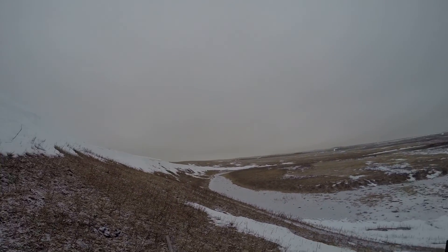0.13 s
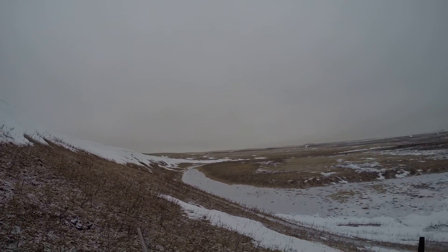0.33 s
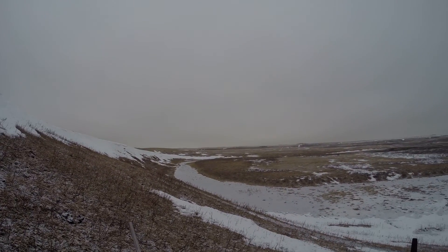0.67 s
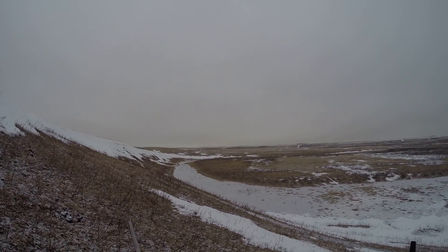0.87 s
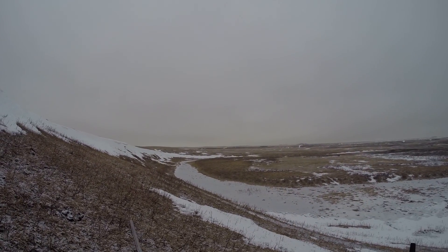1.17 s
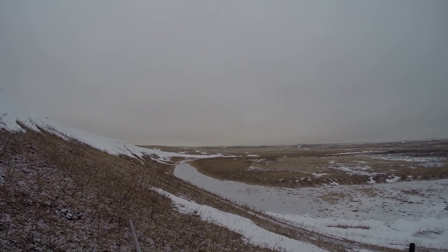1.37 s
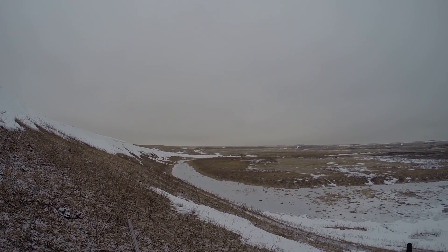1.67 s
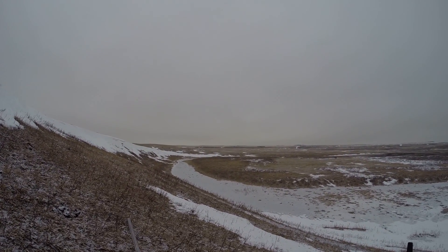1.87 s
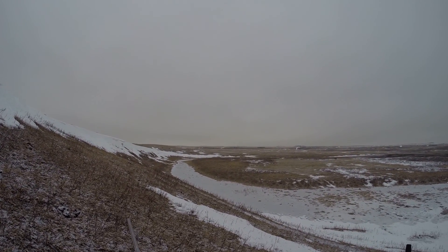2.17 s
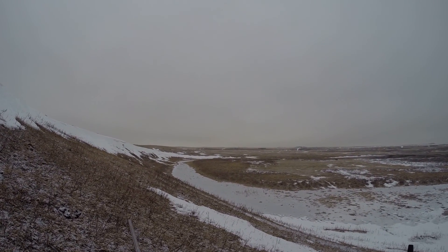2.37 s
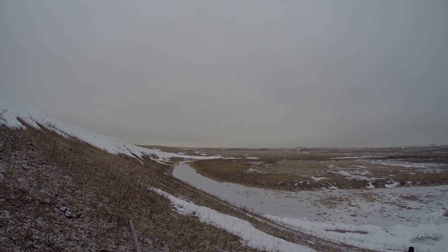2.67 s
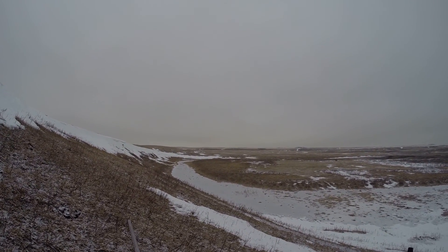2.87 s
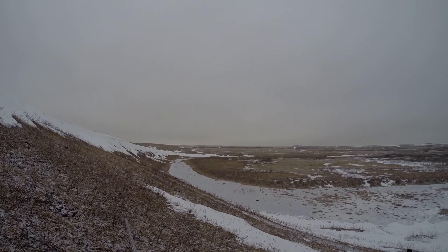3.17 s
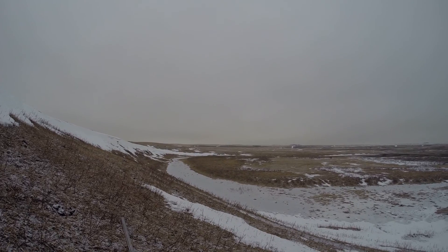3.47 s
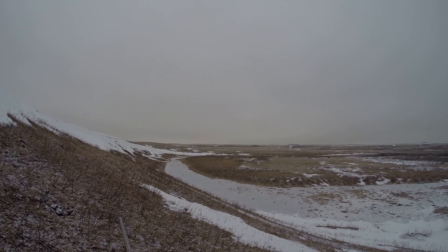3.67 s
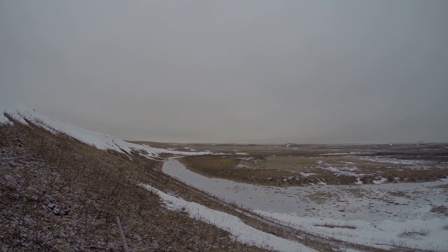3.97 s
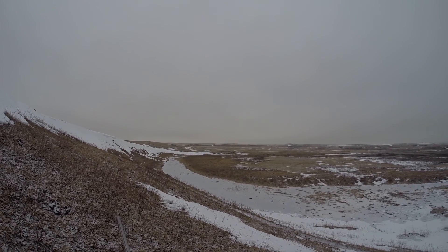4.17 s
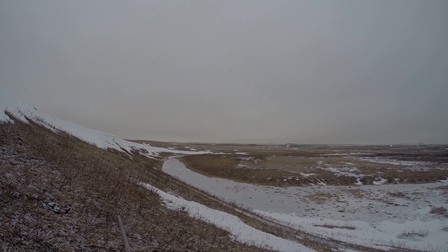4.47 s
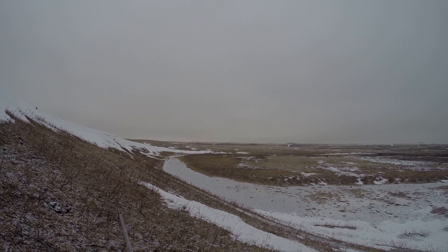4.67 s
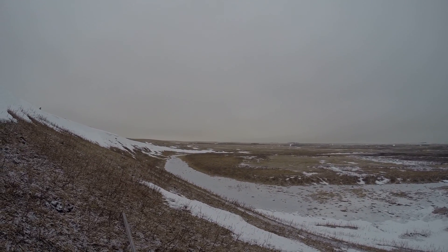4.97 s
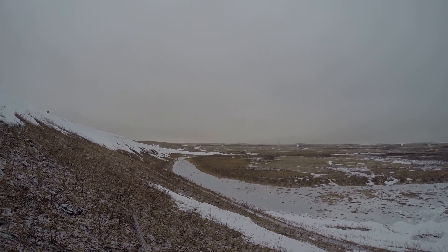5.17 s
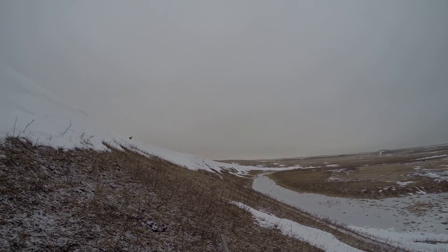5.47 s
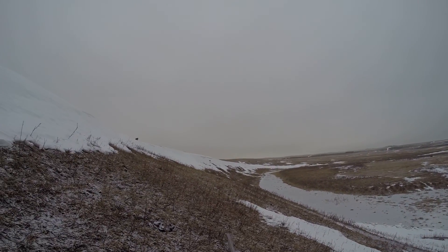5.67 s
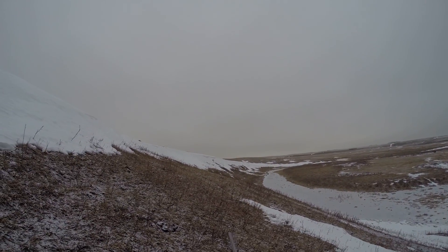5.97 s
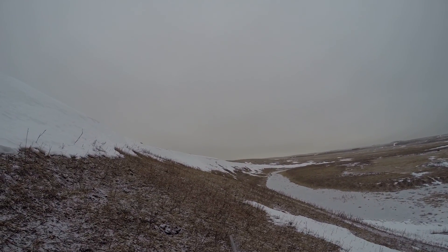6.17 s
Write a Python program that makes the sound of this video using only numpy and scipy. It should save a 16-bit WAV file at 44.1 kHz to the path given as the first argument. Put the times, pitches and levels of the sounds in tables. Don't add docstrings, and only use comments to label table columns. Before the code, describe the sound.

A wild canine yips, yelps and gives short wavering howls over an open snowy slope, with a distant pack murmuring and faint echoes.

```python
import sys
import numpy as np
from scipy import signal
from scipy.io import wavfile
from scipy.ndimage import uniform_filter1d

SR = 44100
rng = np.random.default_rng(int(sys.argv[2]) if len(sys.argv) > 2 else 0)


def decibels_to_gain(level_db):
    exponent = np.asarray(level_db, float) / 20
    return 10 ** exponent


def unload_wav(signal):
    wavfile.write(
        sys.argv[1],
        SR,
        np.round(np.clip(np.atleast_2d(signal).T, -1, 1) * 32767).astype(np.int16),
    )


N = 278712
T = np.arange(N) / SR

# t/s, pitch f/Hz, effort level/dB
YIPS = [
    [(.143, 928, -48.5), (.148, 1063, -41), (.158, 1228, -46), (.167, 1237, -45.5), (.177, 1208, -49.5),
     (.185, 1065, -58)],
    [(.192, 990, -41.5), (.199, 890, -54), (.205, 845, -51), (.212, 815, -68)],
    [(.288, 1177, -65), (.301, 1188, -54), (.313, 958, -44), (.323, 936, -48), (.329, 1147, -41),
     (.34, 1167, -41.5), (.351, 1164, -40.5), (.367, 1040, -40.5), (.378, 952, -53)],
    [(4.243, 963, -55), (4.261, 1013, -44.5), (4.287, 959, -45), (4.319, 956, -51), (4.335, 1008, -61)],
    [(4.4, 1169, -61), (4.418, 1007, -48.5), (4.432, 984, -51), (4.44, 1048, -45), (4.46, 1050, -40.5),
     (4.472, 1205, -45), (4.494, 1184, -49.5)],
    [(4.656, 890, -61), (4.667, 905, -52), (4.683, 998, -47), (4.695, 997, -42.5), (4.727, 907, -54.5)],
    [(4.822, 1125, -59), (4.836, 932, -60), (4.848, 931, -54.5), (4.866, 965, -53), (4.876, 1040, -48.5),
     (4.9, 992, -52.5), (4.915, 1025, -53.5), (4.934, 1005, -55.5)],
]
WARBLES = [
    [(.584, 918, -58), (.6, 924, -52), (.612, 928, -49), (.638, 1014, -39.5), (.652, 1022, -40.5),
     (.662, 945, -43.5), (.674, 942, -41), (.684, 1084, -40), (.691, 1127, -41.5)],
    [(.703, 1051, -40), (.72, 1068, -40), (.731, 1004, -39.5), (.746, 973, -42), (.778, 978, -44.5),
     (.79, 1110, -50), (.798, 1099, -46.5)],
    [(1.991, 939, -57), (2.0, 928, -50), (2.012, 967, -38), (2.022, 970, -41.5), (2.037, 924, -46.5),
     (2.058, 900, -45), (2.086, 946, -43), (2.108, 989, -37.5)],
    [(2.138, 942, -41.5), (2.149, 995, -37.5), (2.163, 1146, -37.5), (2.178, 1069, -38),
     (2.19, 1123, -40.5), (2.201, 1105, -36.5), (2.214, 932, -42)],
    [(2.986, 1099, -38.5), (2.997, 1036, -40), (3.005, 922, -44), (3.02, 923, -44.5), (3.049, 957, -39.5),
     (3.098, 954, -43)],
    [(3.105, 972, -42), (3.12, 1041, -40), (3.136, 1022, -40), (3.16, 938, -44), (3.185, 947, -45),
     (3.213, 998, -36.5), (3.23, 1042, -40.5), (3.252, 1070, -46), (3.26, 1060, -59)],
    [(3.773, 1308, -44.5), (3.864, 1360, -46.5), (3.872, 1446, -46.5), (3.887, 1292, -51),
     (3.899, 1282, -51), (3.911, 1484, -45), (3.957, 1640, -49.5), (3.997, 1605, -51), (4.027, 1454, -47.5)],
]
YELPS = [
    [(1.04, 833, -74), (1.053, 920, -57), (1.069, 935, -42.5), (1.081, 1093, -37), (1.097, 1158, -41),
     (1.107, 1140, -45)],
    [(1.463, 798, -68), (1.479, 881, -48), (1.493, 1130, -36.5), (1.501, 1166, -45), (1.508, 1330, -43),
     (1.515, 1298, -49.5)],
    [(1.541, 1040, -44), (1.563, 983, -40.5), (1.581, 960, -40), (1.591, 1052, -38), (1.599, 1070, -39)],
    [(1.613, 1244, -36.5), (1.631, 1297, -39.5), (1.638, 1237, -42.5), (1.651, 1240, -37),
     (1.681, 1293, -37), (1.702, 1452, -38.5)],
    [(1.72, 1533, -37), (1.744, 1527, -38), (1.758, 1490, -34), (1.79, 1489, -35.5), (1.802, 1230, -40.5),
     (1.814, 1039, -48.5)],
    [(2.773, 884, -66), (2.776, 887, -43), (2.784, 919, -58.5), (2.798, 956, -38)],
    [(2.803, 1168, -41), (2.813, 1211, -41.5), (2.84, 1197, -39.5), (2.882, 1072, -38.5),
     (2.888, 1048, -36.5), (2.894, 1104, -39), (2.928, 1179, -42.5), (2.975, 1149, -43.5)],
    [(5.812, 1036, -56), (5.818, 1040, -43.5), (5.827, 1254, -37.5), (5.831, 1404, -37), (5.837, 1467, -34),
     (5.871, 1483, -33.5), (5.889, 1410, -34.5), (5.897, 1181, -41.5)],
    [(5.912, 1151, -40), (5.93, 1148, -42.5), (5.946, 1149, -41.5), (5.969, 1132, -35.5),
     (5.977, 1075, -37.5)],
]
HOWLS = [
    [(1.123, 936, -40.5), (1.135, 947, -45), (1.151, 978, -46.5), (1.19, 967, -41.5), (1.223, 961, -38.5),
     (1.28, 946, -44)],
    [(2.232, 911, -46), (2.31, 920, -42.5), (2.345, 955, -39.5), (2.368, 1033, -36.5), (2.4, 999, -37),
     (2.47, 996.5, -34), (2.55, 972, -38.5), (2.578, 997.6, -37.5), (2.603, 983, -38), (2.613, 975, -60)],
    [(3.506, 955, -44.5), (3.55, 988, -38), (3.6, 1124, -41), (3.663, 1160, -39), (3.671, 1116, -40),
     (3.682, 1157, -42), (3.721, 1154, -43.5), (3.737, 1197, -44)],
    [(5.126, 980, -61), (5.138, 992, -57), (5.162, 1150, -61), (5.2, 1124, -59.5), (5.28, 1134, -43),
     (5.31, 1143, -41), (5.352, 1157, -39), (5.39, 1078, -40), (5.409, 1166, -39.5)],
    [(5.429, 1040, -37.5), (5.455, 983, -40), (5.5, 971, -40.5), (5.545, 952, -44.5), (5.563, 966, -43.5),
     (5.577, 1005, -37), (5.586, 992, -58)],
    [(5.989, 993, -41), (6.003, 961, -40), (6.06, 922.5, -46.5), (6.138, 914, -52.5), (6.208, 934, -48.5),
     (6.256, 906, -60.5), (6.3, 890, -63)],
]
# start t/s, end t/s, flutter rate f/Hz, swing f/Hz
FLUTTERS = [
    (.327, 0.352, 108, 88),
    (2.166, 2.192, 117, 80),
    (2.905, 2.98, 96.2, 35),
    (3.771, 3.869, 61.8, 26),
    (5.355, 5.398, 58, -56),
]
# start t/s, peak t/s, end t/s, peak level/dB
DOUBLED = [(.595, .64, .676, -47), (.672, .69, .71, -49), (.7, .735, .776, -50),
           (1.095, 1.118, 1.13, -49.5), (2.022, 2.042, 2.08, -45), (2.07, 2.088, 2.106, -56),
           (2.1, 2.14, 2.171, -40), (2.16, 2.184, 2.2, -50), (2.19, 2.208, 2.262, -46.5),
           (2.394, 2.43, 2.5, -46), (2.42, 2.54, 2.59, -38), (2.885, 2.895, 2.975, -57),
           (2.965, 3.015, 3.07, -42.5), (3.04, 3.11, 3.19, -38.5), (3.14, 3.195, 3.228, -46),
           (4.26, 4.268, 4.284, -53), (4.686, 4.698, 4.73, -49), (5.35, 5.375, 5.425, -51),
           (5.416, 5.44, 5.507, -43.5), (5.97, 5.997, 6.061, -36.5), (6.08, 6.16, 6.23, -59)]
# start t/s, end t/s, level/dB
OCTAVE = [(.59, .64, -66), (1.036, 1.075, -63), (1.08, 1.11, -65.5), (1.11, 1.25, -68),
          (1.463, 1.478, -53.5), (1.56, 1.62, -71), (1.99, 2.05, -65), (2.22, 2.34, -67),
          (2.47, 2.61, -70.5), (4.255, 4.29, -64), (2.773, 2.798, -52.5), (2.843, 2.88, -63.5),
          (2.9, 2.99, -65), (3.01, 3.11, -66.5), (3.5, 3.54, -65.5), (3.59, 3.67, -64), (3.695, 3.75, -61),
          (3.77, 3.87, -67.5), (.355, .39, -66), (4.655, 4.745, -65.5), (5.27, 5.45, -74),
          (6.0, 6.08, -62.5), (6.1, 6.21, -67.5), (2.805, 2.812, -66.5)]
TWELFTH = [(2.04, 2.08, -70), (2.22, 2.33, -66), (3.55, 3.65, -72), (5.28, 5.36, -76)]
# start t/s, end t/s, level/dB
FIVE_HALVES = [(2.02, 2.05, -65), (2.16, 2.31, -72), (2.38, 2.45, -75)]
SEVEN_HALVES = [(2.41, 2.59, -73.5)]
EIGHT_HALVES = [(2.24, 2.34, -80)]
NINE_HALVES = [(2.42, 2.56, -79)]
# start t/s, end t/s, level/dB
QUARTERS = [(2.885, 2.915, -54), (2.915, 2.97, -58), (3.668, 3.738, -52)]
THIRDS = [(3.803, 3.88, -54)]
# start t/s, end t/s, rasp level/dB against the tone
RASPS = [(.775, .81, -2.5), (1.085, 1.12, -13.5), (.33, .35, -20), (2.165, 2.19, -9), (2.796, 2.803, -8),
         (2.91, 2.98, -5.5), (3.78, 3.93, -32), (4.44, 4.5, -20), (5.345, 5.42, -17), (6.07, 6.25, -22)]
# t/s, peak level/dB
POPS = [(1.99, -48), (0.13, -54), (2.776, -43), (5.808, -46), (3.497, -43), (1.064, -45), (4.402, -60),
        (4.66, -61)]
# delay t/s, level/dB
ECHO = [(0.012, -36), (.04, -40.5), (.1, -47.5), (0.143, -36), (.158, -40.5), (.165, -50.5), (.3, -52)]
# delay t/s, level/dB
RIDGE = (0.152, -23.5)
# start t/s, full from t/s, full to t/s, end t/s, level/dB
MURMUR = [(0.074, 0.13, 0.62, .57, -63), (0.444, 0.682, .7, 0.99, -59), (1.131, 1.2, 1.73, 2.08, -61.5),
          (1.992, 2.149, 2.36, 2.87, -65), (2.764, 2.902, 3.16, 3.3, -61), (3.44, 3.81, 4.03, 4.5, -60.5),
          (4.151, 4.267, 4.3, 4.6, -59), (4.378, 4.428, 4.43, 5, -62), (4.6, 4.679, 4.38, 5.14, -61.5),
          (5.073, 5.341, 5.4, 5.66, -62), (6.06, 6.152, 6.27, 6.52, -60.5), (3.252, 3.331, 3.47, 3.66, -67),
          (5.501, 5.599, 5.65, 5.8, -68), (3.701, 3.79, 4.04, 4.1, -59)]
# f/Hz, level/dB (per Hz)
MURMUR_TONE = [(250, 0), (600, -0.5), (760, 2.5), (1640, 10.5), (1720, 8.5), (2800, 0), (3400, -7),
               (8000, -26)]
# f/Hz, width f/Hz, level/dB
MURMUR_PEAKS = [(450, 100, 10), (830, 90, 5), (1550, 60, 6), (2310, 50, 6), (2750, 120, 3)]
# start t/s, end t/s, start f/Hz, end f/Hz,
# level/dB
FAR = [(.102, .138, 1600, 1530, -61), (5.315, 5.35, 1480, 1500, -58), (3.97, 4.0, 2640, 2640, -66),
       (.135, .143, 1560, 1680, -57), (.815, .9, 1600, 1600, -65), (.39, .58, 1570, 1580, -68),
       (1.363, 1.6, 1510, 1500, -65), (3.75, 3.86, 2304, 2300, -66), (3.88, 4.06, 2310, 2300, -66),
       (4.049, 4.298, 1580, 1570, -65), (4.758, 4.784, 1250, 1260, -57), (4.755, 4.785, 1540, 1570, -63),
       (1.826, 1.84, 1240, 1260, -58), (1.812, 1.848, 1545, 1535, -57), (1.915, 1.948, 1515, 1495, -52),
       (2.989, 3.25, 2285, 2346, -70), (2.33, 2.52, 2740, 2735, -72), (5.274, 5.52, 2297, 2270, -69),
       (6.129, 6.22, 2773, 2794, -71), (3.17, 3.22, 3420, 3520, -74)]
# start t/s, end t/s, middle f/Hz, width f/Hz, level/dB
HAZE = [(1.22, 1.98, 2700, 490, -72.5), (2.94, 3.37, 2310, 290, -66.5), (3.9, 4.1, 2600, 360, -65.5),
        (4.34, 4.65, 2750, 250, -69.5), (4.7, 4.81, 2800, 300, -68), (5.26, 5.5, 2100, 680, -70),
        (5.3, 5.65, 3000, 860, -74), (1.7, 1.95, 2400, 230, -73), (0.16, 0.99, 2400, 460, -80)]
# middle t/s, level/dB
CHIRPS = [(0.679, -77), (.81, -78.5), (0.939, -79), (1.201, -76), (1.319, -80.5), (1.551, -77),
          (1.79, -77.5), (1.96, -82), (2.2, -79), (2.31, -77.5), (2.609, -80), (3.14, -78.5), (3.291, -79),
          (3.37, -82.5), (3.66, -77), (3.8, -79), (4.04, -77), (4.29, -79), (4.45, -78), (4.72, -79),
          (4.83, -80.5), (5.119, -81.5)]
# start t/s, end t/s, f/Hz, level/dB, octave level/dB
SQUEAKS = [
    (2.95, 3.02, 6645, -83, -76),
    (3.04, 3.09, 8000, -80, -95),
    (5.82, 5.89, 6655, -80, -76),
]
# middle t/s, length t/s, level/dB
GUSTS = [(0.295, 0.038, -65), (.5, .02, -56), (0.952, 0.036, -60), (1.2, .05, -64), (1.86, .04, -55),
         (2.13, 0.028, -54), (2.418, .04, -60), (2.779, 0.027, -61), (4.36, 0.057, -58.5),
         (4.899, 0.098, -62), (5.2, .04, -58), (6.2, 0.047, -62)]
# f/Hz, level/dB (per Hz)
AIR = [(10, -4), (28, 5), (60, -6.5), (85, -9.5), (250, -11.5), (600, -18.5), (1500, -24), (3000, -26.5),
       (6000, -32), (10000, -38), (14000, -40.5), (15300, -48)]
# f/Hz, share
KEPT = [(12600, 1), (12900, .72), (14000, .7), (14250, .45), (14900, .33), (15100, .07), (15300, .02)]

LEGATO_S = .05
ATTACK_S, ATTACK_DB, SCOOP = 0.01316, -35, .04
RELEASE_S, RELEASE_DB, SAG = .016, -37, .06
THROAT_HZ, THROAT_WIDTH_HZ, THROAT_DB = 1211, 179, 7
LOCK_ENDS_DB, LOCK_BEND, LOCK_SHUT_DB = -16, 3.0, -200
MURMUR_REST_DB, MURMUR_LOW_DB = -74.5, 5
AIR_DB = -58.5


def voice():
    shimmer, shake = rng.standard_normal((N, 2)).T
    turns = 2 * np.pi * np.cumsum(pitch()) / SR

    def line(count, order=1):
        return np.sqrt(2) * np.cos(turns * count / order)

    s, meant_hz, db = sung()
    off_throat = (np.interp(T, s, meant_hz) - THROAT_HZ) / THROAT_WIDTH_HZ
    throat_db = THROAT_DB / (1 + (2 * off_throat) ** 2)
    effort = decibels_to_gain(uniform_filter1d(np.interp(T, s, db) + throat_db, size=90))
    effort *= decibels_to_gain(0.25 * np.tanh(evened(band(shimmer, 12.0, 100))))
    tone = effort * line(count=1)

    doubled = line(count=3, order=2) + decibels_to_gain(-33.5) * line(count=1, order=2)
    doubled *= swells(DOUBLED, LOCK_ENDS_DB, LOCK_BEND, LOCK_SHUT_DB)

    quarters = line(count=3, order=4) + decibels_to_gain(0.5) * line(count=5, order=4)
    quarters += decibels_to_gain(-4) * line(count=6, order=4) + decibels_to_gain(-15) * line(count=9, order=4)
    quarters *= spans(QUARTERS, edge=0.013)

    throb = 1 + .8 * np.sin(2 * np.pi * 55 * T)
    thirds = throb * (line(count=2, order=3) + decibels_to_gain(-25) * line(count=1, order=3))
    thirds *= spans(THIRDS)

    rasp = spans(RASPS) * evened(band(shake, 130, 480) + 2.2 * band(shake, 75, 125))
    shaken = band(band(rasp * (tone + doubled), 800, 1800), 760, 1900)

    upper = spans(OCTAVE, edge=0.013) * line(count=2)
    upper += spans(TWELFTH) * line(count=3)
    upper += spans(FIVE_HALVES) * line(count=5, order=2)
    upper += spans(SEVEN_HALVES) * line(count=7, order=2)
    upper += spans(EIGHT_HALVES) * line(count=4)
    upper += spans(NINE_HALVES) * line(count=9, order=2)
    upper *= decibels_to_gain(1.5 * evened(band(shimmer, 15, 90))) + 2 * rasp
    return tone + doubled + upper + quarters + thirds + shaken


def pitch():
    s, hz, _ = sung()
    waver = 1 + 0.0039 * evened(band(rng.standard_normal(N), 9.0, 75))
    flutter = np.zeros(N)
    for a, b, rate, swing in FLUTTERS:
        flutter += swing * spans([(a, b, 0)], edge=0.005) * np.sin(2 * np.pi * rate * (T - a))
    return uniform_filter1d(np.interp(T, s, hz), size=150) * waver + flutter


def sung():
    notes = sorted(YIPS + WARBLES + YELPS + HOWLS)
    rows = [row for note in notes for row in note]
    ends = [s for note in notes for s in (note[0][0], note[-1][0])]
    gaps = np.diff([-9] + ends + [99])[::2]
    for note, before, after in zip(notes, gaps, gaps[1:]):
        (a, a_hz, a_db), (b, b_hz, b_db) = note[0], note[-1]
        if before > LEGATO_S:
            rows += [(a - ATTACK_S * k, a_hz * (1 - SCOOP), a_db + ATTACK_DB * k ** 2) for k in (1, 2)]
        if after > LEGATO_S:
            rows += [(b + RELEASE_S * k, b_hz * (1 - SAG), b_db + RELEASE_DB * k ** 2) for k in (1, 2)]
    return np.transpose(sorted(rows))


def swells(rows, ends_db, bend, shut_db=0):
    power = np.zeros(N)
    for a, peak, b, db in rows:
        rising = (peak - T) / max(peak - a, 1e-3)
        falling = (T - peak) / max(b - peak, 1e-3)
        away = np.where(T < peak, rising, falling)
        level_db = db + ends_db * np.minimum(away, 9) ** bend + shut_db * np.maximum(away - 1, 0)
        power += decibels_to_gain(2 * level_db)
    return np.sqrt(power)


def pops():
    snaps, t = np.zeros(N), T[:400]
    for s, db in POPS:
        snaps[round(s * SR)] = decibels_to_gain(db)
    ring = np.sin(2 * np.pi * 1150 * t) * decibels_to_gain(-60 * t / 0.017)
    return signal.oaconvolve(snaps, ring)[:N]


def slopes(x):
    taps, drift = rng.standard_normal(SR // 3), rng.standard_normal(N)
    delay, db = np.transpose(ECHO)
    tail = taps * decibels_to_gain(np.interp(T[:len(taps)], delay, db, left=-99, right=-99) - 21.0)
    back = signal.oaconvolve(x, tail)[:N]
    back *= decibels_to_gain(3 * np.tanh(.8 * evened(band(drift, 12, 80))))
    ridge = decibels_to_gain(RIDGE[1]) * np.interp(T - RIDGE[0], T, x)
    return decibels_to_gain(2.0) * band(back, 790, 1460) + band(decibels_to_gain(4.5) * back + ridge, 1453, 1620)


def pack():
    murmur = noise(MURMUR_TONE, patchy_db=1.4, peaks=MURMUR_PEAKS)
    low = band(murmur, 320, 1590) * (decibels_to_gain(MURMUR_LOW_DB) - 1)
    answers_db = []
    for *times, db in MURMUR:
        answers_db.append(np.interp(T, times, [MURMUR_REST_DB, db, db, MURMUR_REST_DB]))
    level_db = np.max(answers_db, axis=0)
    return (murmur + low) * decibels_to_gain(level_db) / np.std(band(murmur, 1620, 3600))


def far_tones():
    out = np.zeros(N)
    flicker = evened(band(rng.standard_normal(N), 10, 70))
    blur_hz = 9 * flicker[::-1]
    for a, b, start_hz, end_hz, db in FAR:
        hz = np.interp(T, [a, b], [start_hz, end_hz]) + blur_hz
        out += spans([(a, b, db)], edge=0.016) * np.sin(2 * np.pi * np.cumsum(hz) / SR)
    return out * decibels_to_gain(2.2 * flicker)


def haze():
    hiss = rng.standard_normal(N)
    out = np.zeros(N)
    for a, b, hz, width, db in HAZE:
        out += spans([(a, b, db)], edge=.08) * evened(band(hiss, hz - width / 2, hz + width / 2))
    return out


def chirps():
    puffs = sum(decibels_to_gain(db) * np.exp(-.5 * ((T - s) / .026) ** 2) for s, db in CHIRPS)
    narrow, wide = rng.standard_normal((N, 2)).T
    out = puffs * (evened(band(narrow, 7200, 8000)) + decibels_to_gain(-1.5) * evened(band(wide, 9000, 15000)))
    for a, b, hz, db, octave_db in SQUEAKS:
        turns = 2 * np.pi * (hz * T + 400 * (T - a) ** 2)
        turns += .3 * np.sin(2 * np.pi * 45 * T)
        out += spans([(a, b, db)]) * np.sin(turns)
        out += spans([(a, b, octave_db)]) * np.sin(2 * turns)
    return out


def gusts():
    puffs = sum(decibels_to_gain(db) * np.exp(-.5 * ((T - s) / length) ** 2) for s, length, db in GUSTS)
    return puffs * evened(band(rng.standard_normal(N), 22, 62))


def still_air():
    return decibels_to_gain(AIR_DB) * evened(noise(AIR, patchy_db=0.93))


def noise(tone, patchy_db, peaks=()):
    bins_hz = np.fft.rfftfreq(1024, 1 / SR)
    a, b, patches = rng.standard_normal((N // 256 + 5, 513, 3)).T
    patches = uniform_filter1d(patches, size=10, axis=0)
    patches = evened(uniform_filter1d(patches, size=14, axis=1))
    f, db = np.transpose(tone)
    colour_db = np.interp(np.log(bins_hz + 1), np.log(f), db, right=-90)
    for hz, width, peak_db in peaks:
        colour_db += peak_db / (1 + (2 * (bins_hz - hz) / width) ** 2)
    spectra = (a + 1j * b) * decibels_to_gain(colour_db[:, None] + patchy_db * patches)
    return signal.istft(spectra, nperseg=1024, noverlap=768)[1][:N]


def evened(x):
    return x / np.sqrt(np.mean(x ** 2) + 1e-20)


def band(x, lo_hz, hi_hz):
    return signal.sosfilt(signal.butter(3, [lo_hz, hi_hz], "bandpass", fs=SR, output="sos"), x)


def spans(rows, edge=0.027):
    gain = np.zeros(N)
    for a, b, db in rows:
        corners = [a - edge / 2, a + edge / 2, b - edge / 2, b + edge / 2]
        gain += decibels_to_gain(db) * np.interp(T, corners, [0, 1, 1, 0])
    return gain


def scene():
    caller = voice() + pops()
    distant = slopes(caller) + pack() + far_tones() + haze()
    return (caller + distant + chirps() + gusts() + still_air())[None]


def starved(x):
    hz, _, z = signal.stft(x, SR, nperseg=2048, noverlap=1024)
    share = np.interp(hz, *np.transpose(KEPT))[:, None]
    luck = np.repeat(rng.random((z.shape[2], 205)).T, 5, axis=0)
    usual = np.median(abs(z), axis=2, keepdims=True)
    strong = uniform_filter1d(abs(z), size=9, axis=1) > 2.5 * usual
    z = z * ((luck < share) | strong) / np.maximum(share, .3) ** .5
    return signal.istft(z, SR, nperseg=2048, noverlap=1024)[1][:, :N]


def band_limit(x):
    return signal.sosfilt(signal.butter(12, 15260, fs=SR, output="sos"), x)


def record(dry):
    mix = starved(dry)
    return band_limit(mix)


dry = scene()
out = record(dry)
unload_wav(out)
```